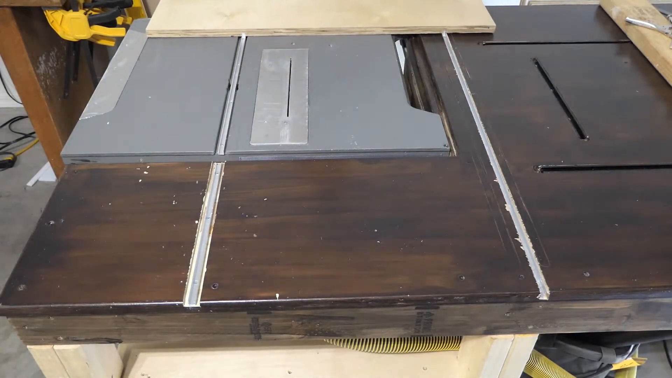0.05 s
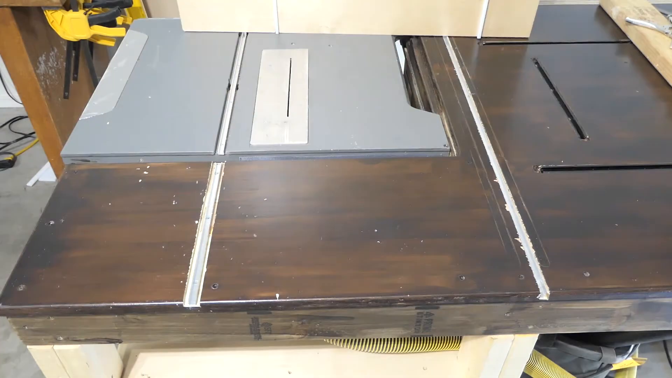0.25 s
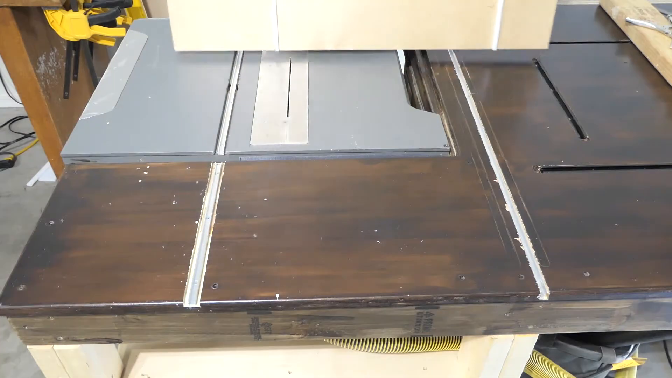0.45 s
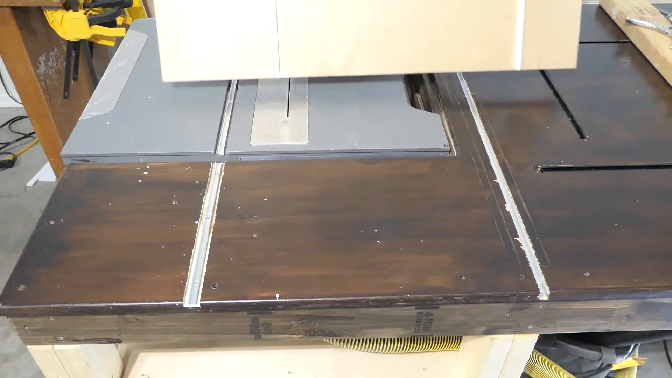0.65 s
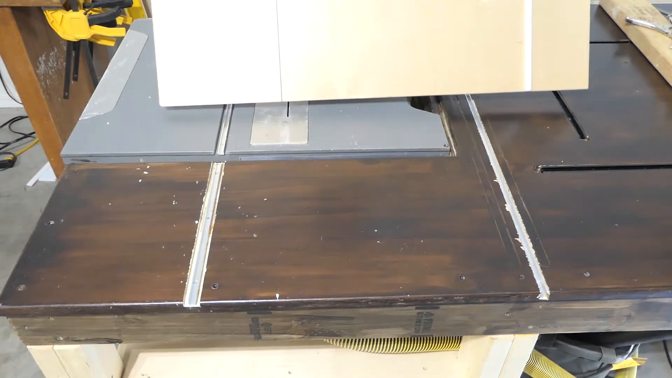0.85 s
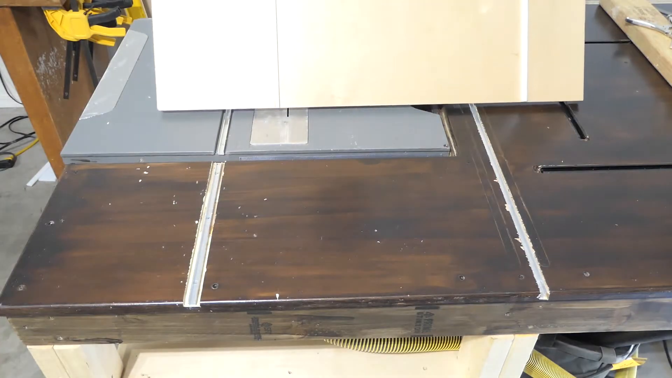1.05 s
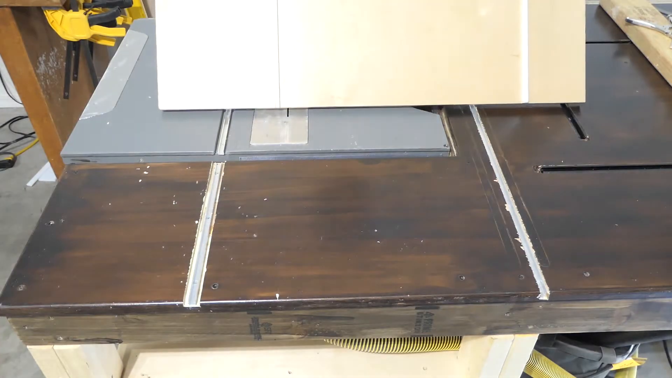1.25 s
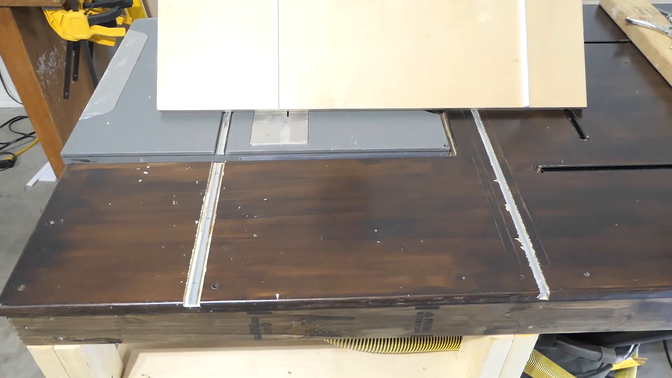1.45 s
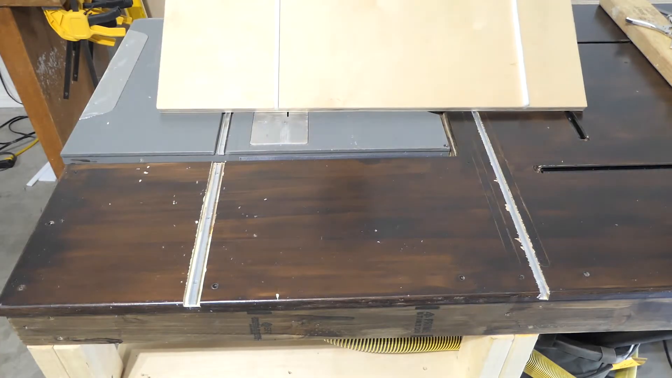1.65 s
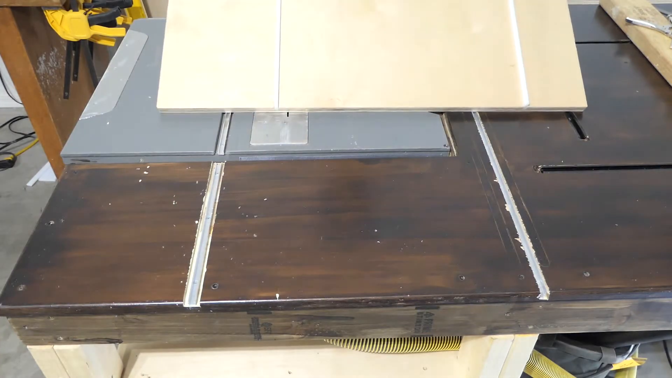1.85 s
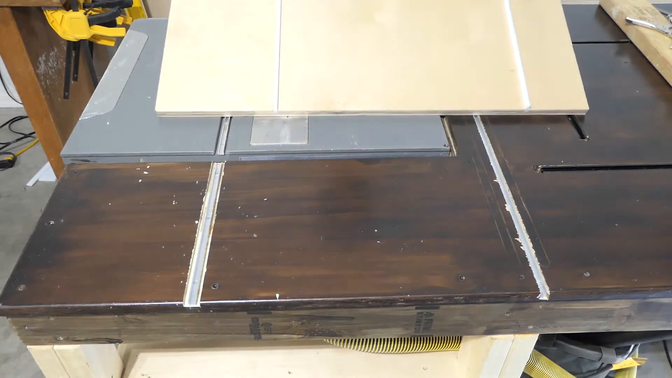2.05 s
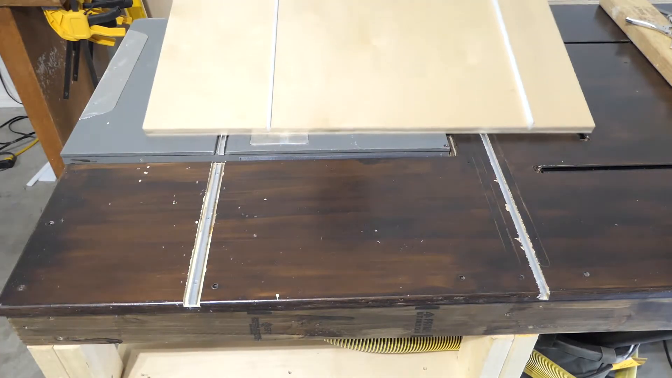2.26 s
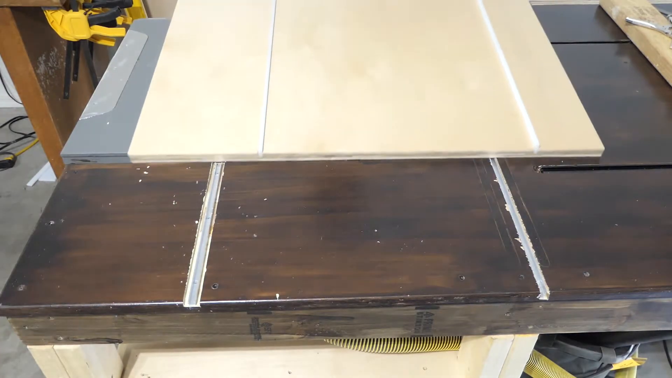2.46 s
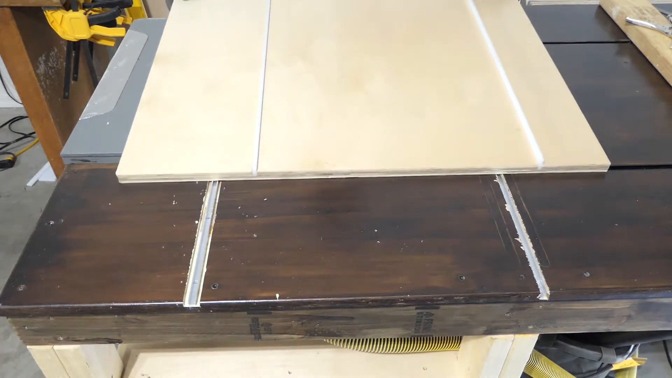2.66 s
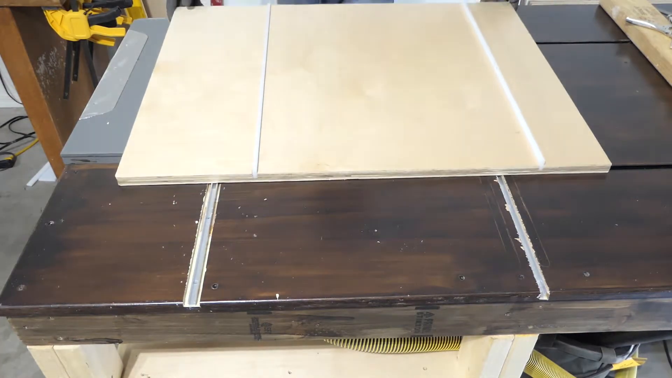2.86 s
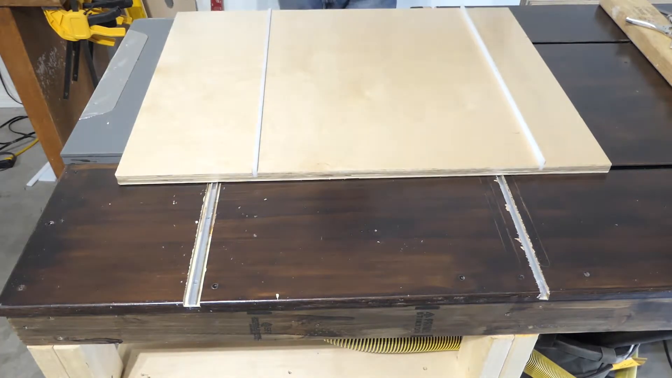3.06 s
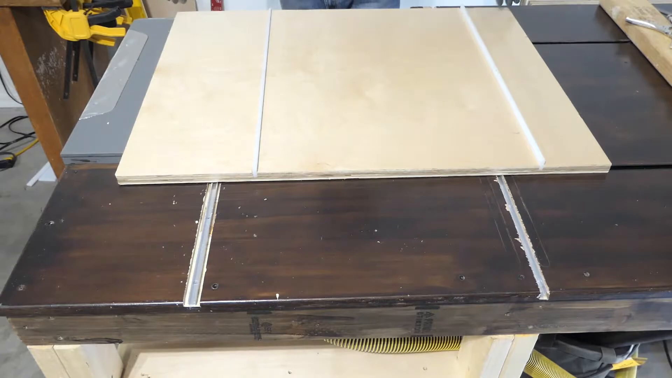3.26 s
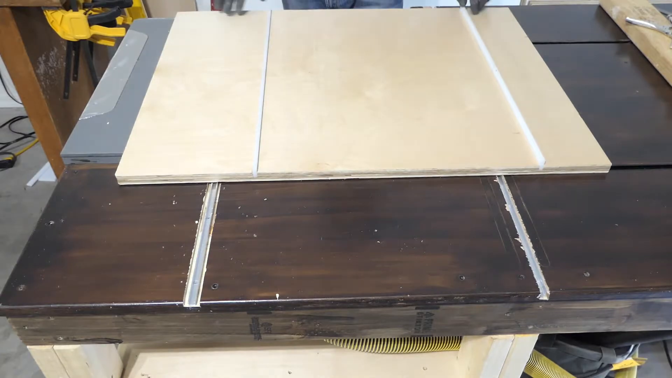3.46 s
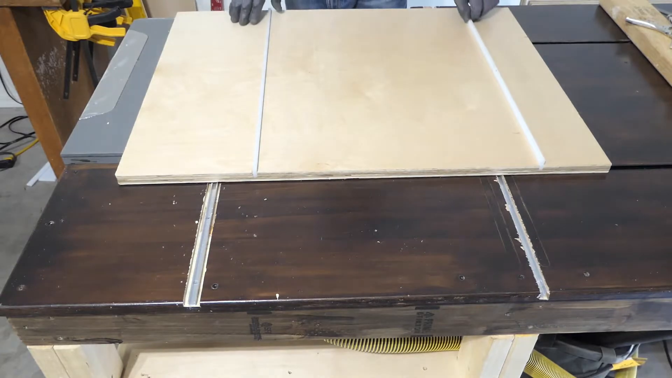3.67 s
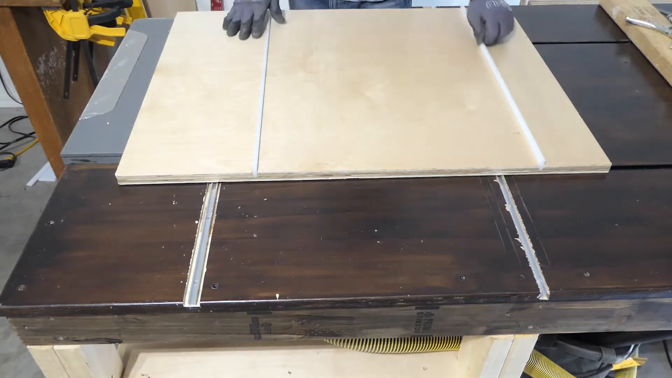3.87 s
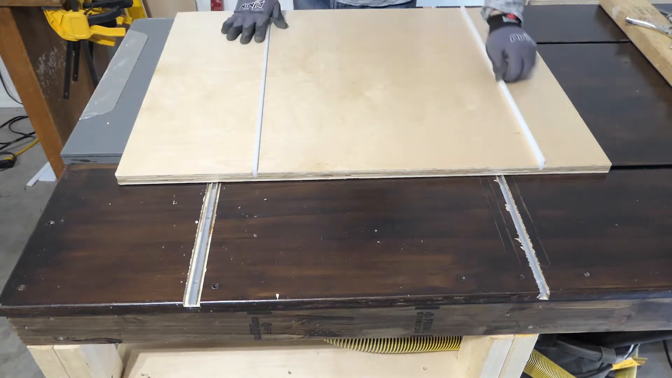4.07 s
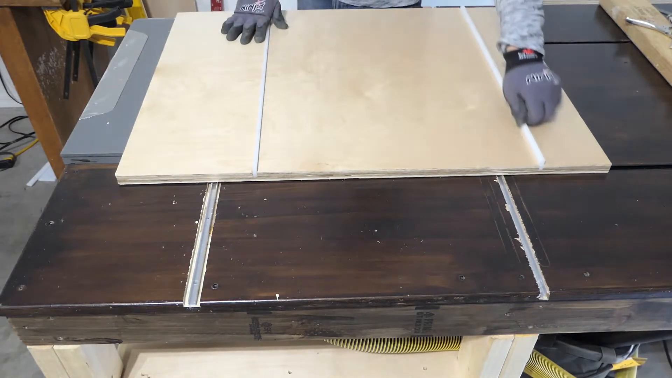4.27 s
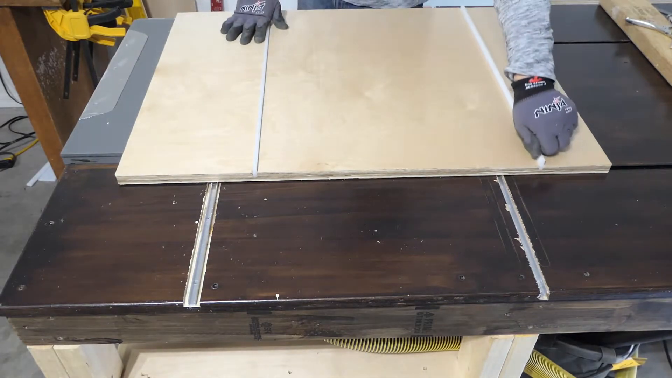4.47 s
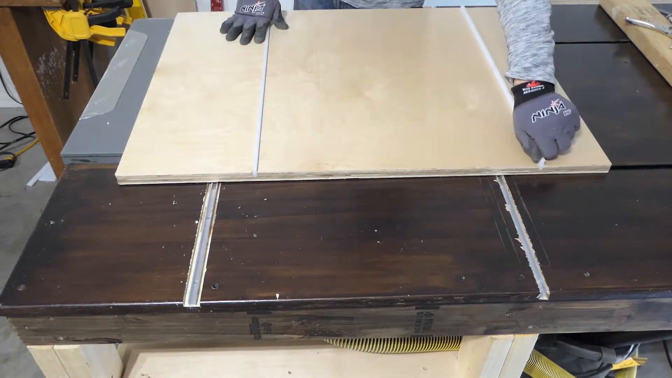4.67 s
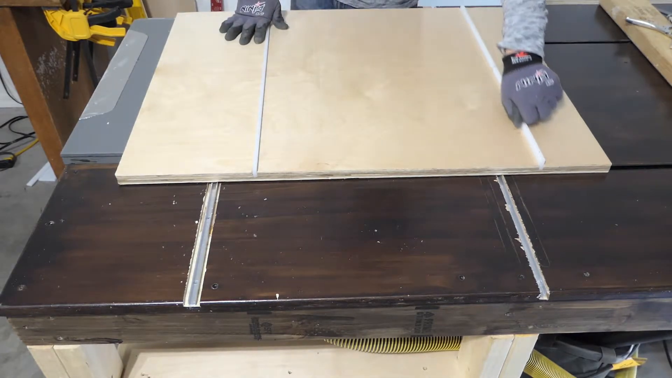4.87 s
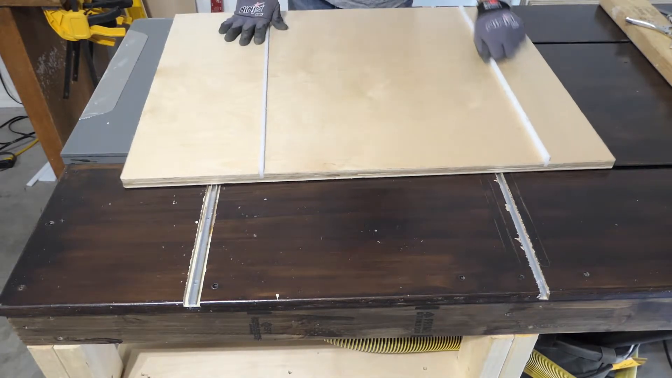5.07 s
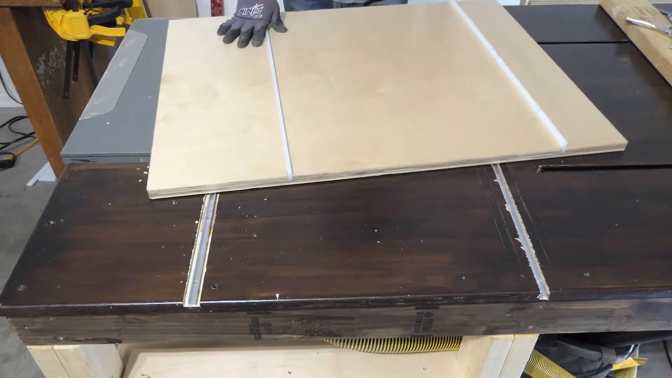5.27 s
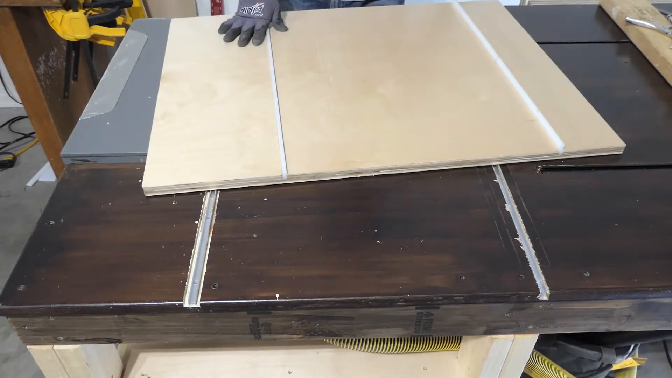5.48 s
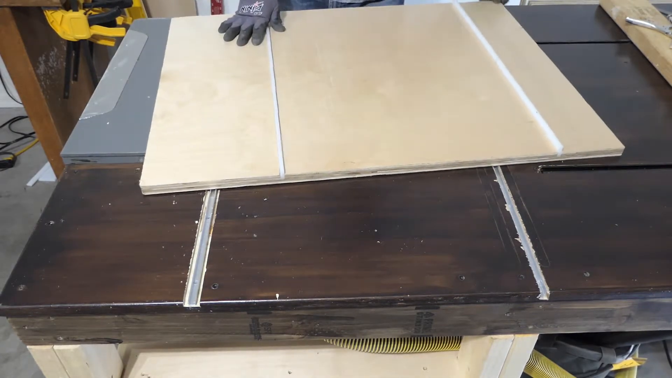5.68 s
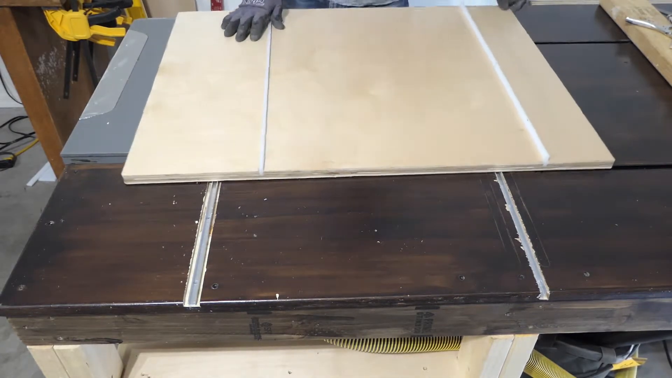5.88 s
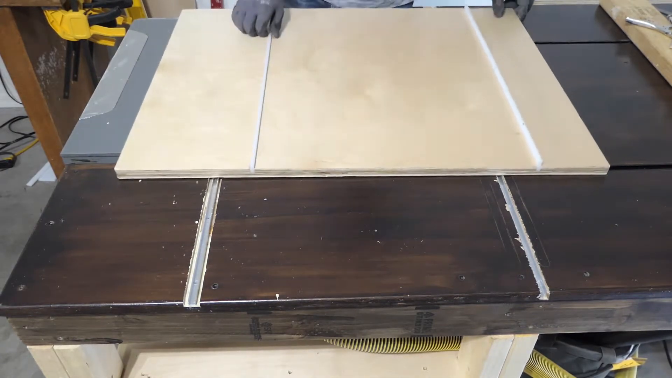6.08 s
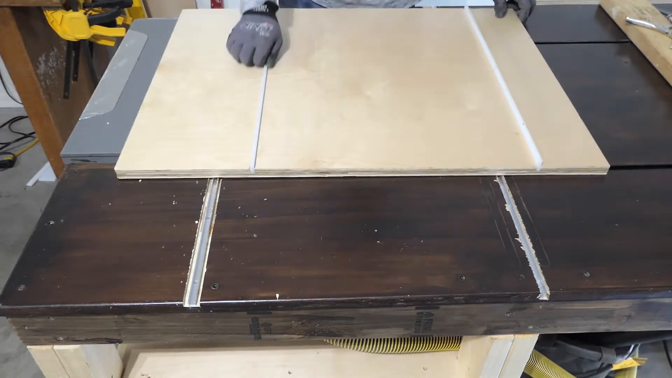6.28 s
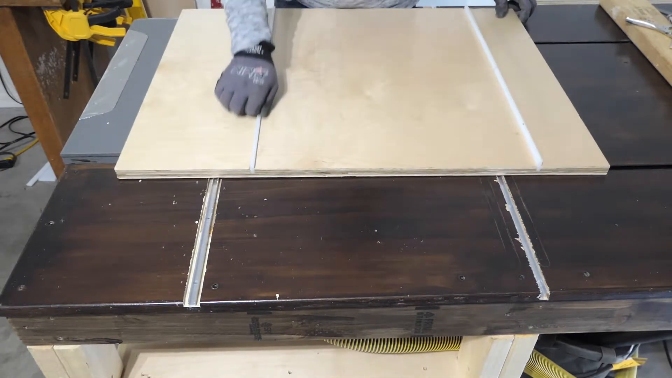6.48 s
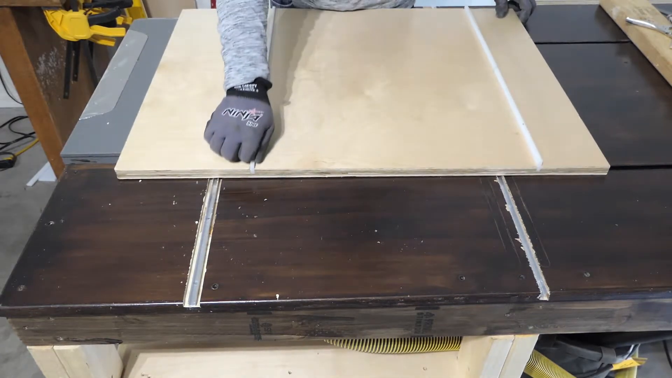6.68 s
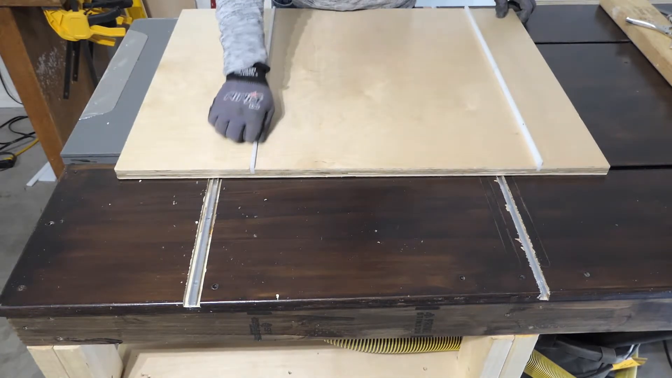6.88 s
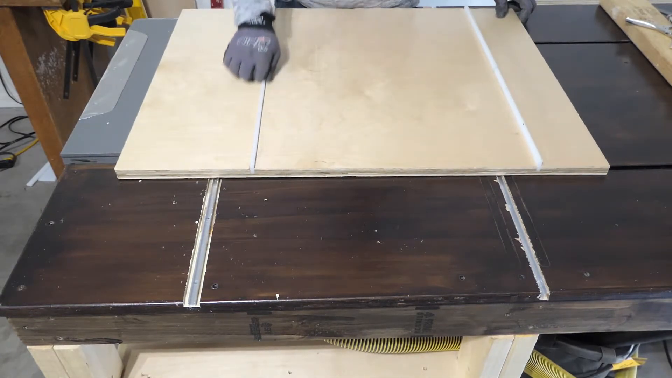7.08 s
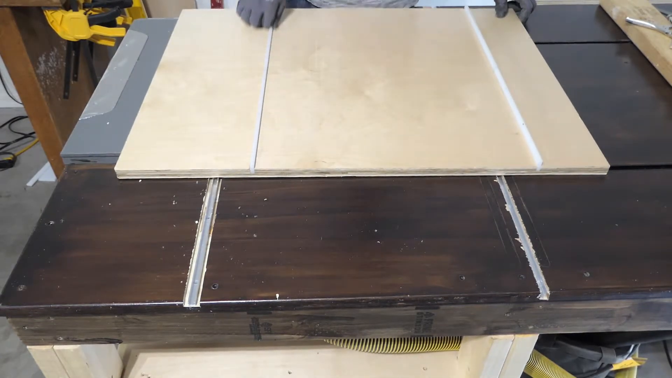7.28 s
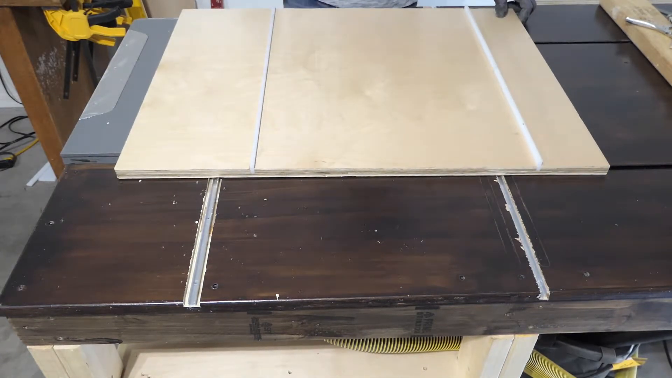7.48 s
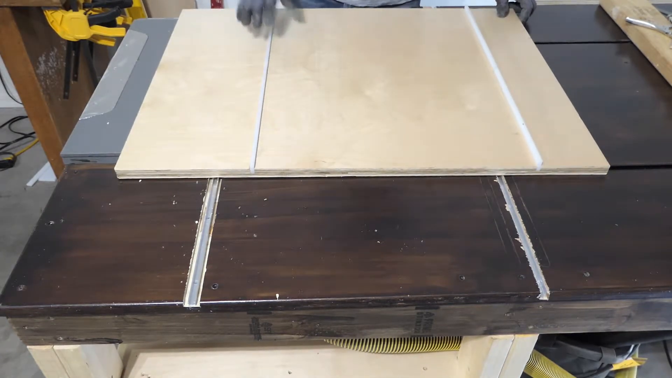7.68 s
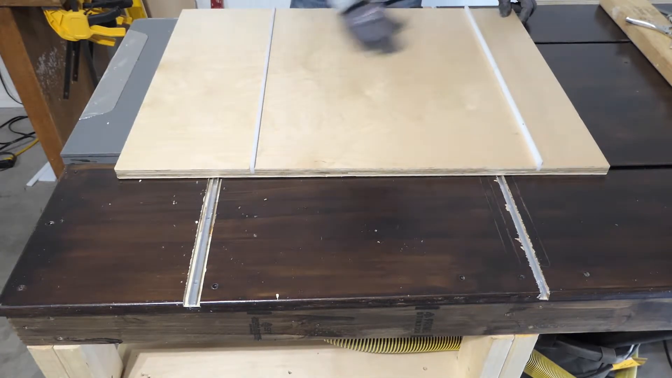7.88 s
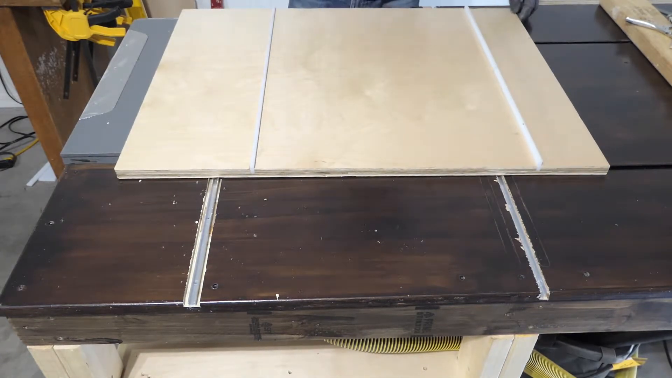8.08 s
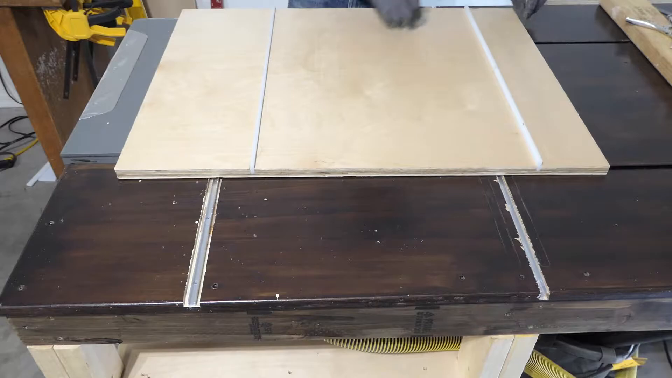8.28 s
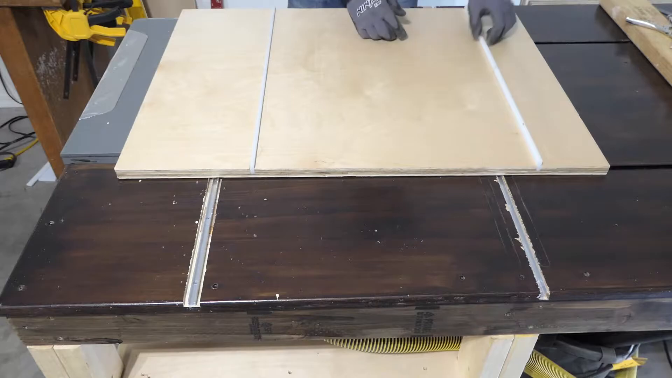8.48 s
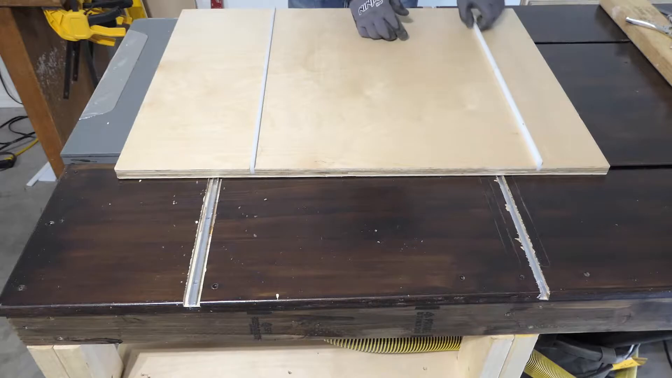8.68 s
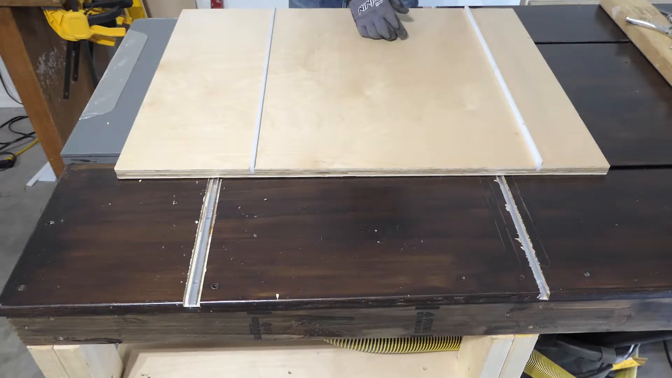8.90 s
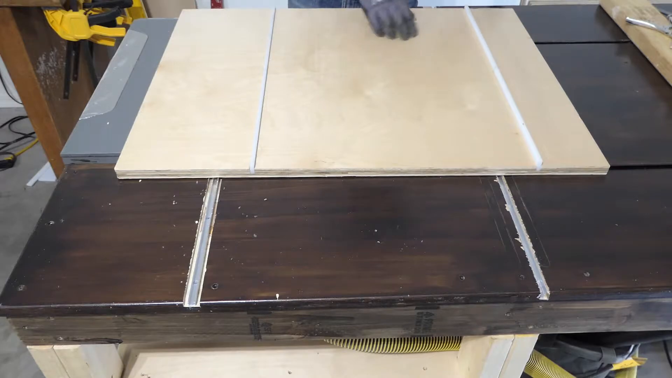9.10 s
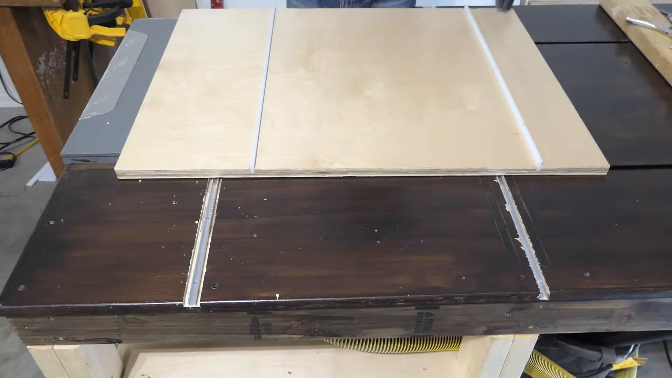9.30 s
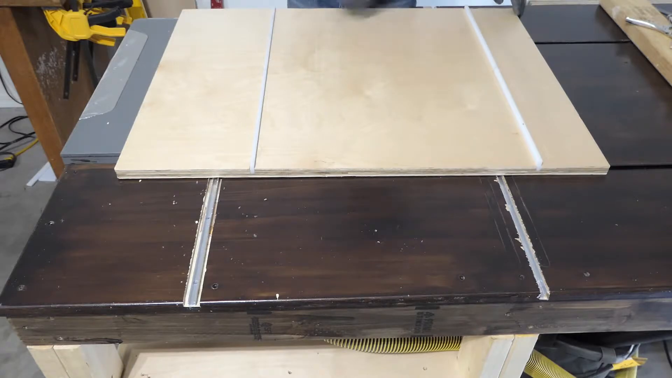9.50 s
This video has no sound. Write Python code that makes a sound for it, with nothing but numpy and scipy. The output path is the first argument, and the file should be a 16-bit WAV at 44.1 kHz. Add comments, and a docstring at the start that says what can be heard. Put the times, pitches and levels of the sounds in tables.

```python
"""A sleeve brushes a sheet of plywood as it scrapes over a table saw, above the soft rumble of a workshop.
The panel, a sled base, is knocked, pushed along the mitre slots, lands with a hard clack and is shifted again.
Gloved hands wipe it and sweep over it in long strokes; the saw stays off.
Rubbing is filtered noise full of tiny slips, blows are decaying tones and noise through the panel's
resonances, and decaying noise echoes make the room around two microphones."""
import sys
import numpy as np
from scipy import signal
from scipy.fft import rfft, irfft, next_fast_len
from scipy.io import wavfile
from scipy.ndimage import uniform_filter1d, map_coordinates

SR = 44100
rng = np.random.default_rng(int(sys.argv[2]) if len(sys.argv) > 2 else 0)


def wrap_up_sound(samples):
    """Save the sound to the file named by the first command line argument, as 16-bit audio."""
    columns = np.atleast_2d(samples).T
    # keep every value between -1 and 1, then stretch to whole-number steps
    tamed = np.clip(columns, -1, 1)
    steps = np.round(tamed * 32767).astype(np.int16)
    wavfile.write(sys.argv[1], SR, steps)


N = 420713  # length in samples
STEP_S = 0.002  # seconds between the points on which movements are drawn


def amp(db):
    """Decibels to gain."""
    return 10 ** (np.asarray(db) / 20)


def unit(x):
    """Scaled to rms 1."""
    return x / np.sqrt(np.mean(x ** 2) + 1e-20)


def along(points, hz):
    """(Hz, value) points read on a log frequency axis."""
    f, v = np.transpose(points)
    return np.interp(np.log(hz + 1), np.log(f + 1), v)


def filtered(x, response):
    """x times a complex response of frequency."""
    n = x.shape[-1]
    padded = next_fast_len(n + SR // 2)
    hz = np.fft.rfftfreq(padded, 1 / SR)
    return irfft(rfft(x, padded) * response(hz), padded)[..., :n]


def coloured(x, spectrum):
    """x given a spectrum, at rms 1."""
    return unit(filtered(x, lambda hz: amp(along(spectrum, hz))))


def resonance(hz, centre, width):
    """A causal band-pass with gain 1 at its centre."""
    return 1j * hz * width / (centre ** 2 - hz ** 2 + 1j * hz * width)


def add(track, s, sound):
    """Mix a sound into a track at time s."""
    part = track[max(round(s * SR), 0):][:len(sound)]
    part += sound[:len(part)]


def gains(rows, fade=0.013):
    """One gain per sample for each dB column, fading out (seconds) beyond the first and last row."""
    s, *columns = np.transpose(rows)
    t = np.arange(N) / SR
    gate = np.clip(1 + np.minimum(t - s[0], s[-1] - t) / fade, 0, 1)
    return np.array([gate * amp(np.interp(t, s, column)) for column in columns])


def clock():
    """The coarse time steps on which movements are drawn."""
    return np.arange(0, N / SR + STEP_S, STEP_S)


def sampled(curves):
    """Curves on the coarse steps, one value per sample."""
    t = np.arange(N) / SR
    return np.array([np.interp(t, clock(), curve) for curve in curves])


def swells(rows, curve):
    """A gain for each level column: every movement eases in, holds, then loses 20 dB in its fall time."""
    total = 0
    for start, rise, hold, fall, db, *others_db in rows:
        t = clock() - start
        slowing = np.maximum(t - rise - hold, 0) / fall
        shape = np.sin(np.pi / 2 * np.clip(t / rise, 0, 1)) * amp(-20 * slowing ** curve)
        # later columns are levels against the first
        total = total + np.outer(amp([0, *others_db]), amp(db) * shape)
    return sampled(total)


def wobble(rate):
    """A smooth random curve with rate knots a second."""
    knots = rng.standard_normal(int(N * rate / SR) + 4)
    return map_coordinates(knots, [np.arange(N) * rate / SR])


def friction(spectrum, rate, smooth_db, uneven_db):
    """Fibres catch and let go: about rate tiny slips a second over a smooth rub, under uneven pressure."""
    slips = (rng.random(N) < rate / SR) * rng.standard_normal(N)
    force = unit(slips) + amp(smooth_db) * rng.standard_normal(N)
    pressure = amp(uneven_db * wobble(55))
    return coloured(force * pressure, spectrum)


def pushing(scrape_db=1.0, grit_db=2.0, judder_db=-1, judder_limit_db=-21):
    """Strength of scrape, grit and judder; in the long push the panel's weight caps the judder."""
    # The long push along the slots. Each row: time in seconds, scrape and grit in dB before their trims.
    long_push = [(1.3, -34, -56), (1.344, -48, -59), (1.456, -37.5, -48.5), (1.51, -33, -49),
                 (1.672, -41.5, -47), (1.726, -33.5, -38), (1.888, -42.5, -45), (2.066, -31, -37),
                 (2.13, -28.5, -42), (2.196, -15.5, -31.5), (2.292, -14, -26.5), (2.356, -16, -36.5),
                 (2.7, -27, -42), (2.724, -21, -47), (2.908, -39.5, -51), (2.95, -36, -52)]
    # Short shoves of the panel. Each row: start, rise, hold and fall in seconds, scrape in relative dB,
    # grit and judder in dB against the scrape.
    shoves = [(0.0, 0.0017, 0.089, .02, -34.5, -11.5, -5), (0.09, 0.023, 0.122, .008, -32, -12.5, -5.5),
              (0.34, 0.014, 0.0071, 0.042, -31, -22, -14), (0.625, 0.019, .01, 0.17, -41.5, -23, -18.5),
              (2.95, 0.038, 0.035, 0.012, -26, -6.5, -6), (3.006, 0.014, 0.14, 0.22, -22.5, -17, 1),
              (4.18, 0.0081, .02, 0.65, -42, -2, -2.5), (5.066, 0.18, 0.044, 0.15, -30, -8, -1),
              (5.44, 0.021, .03, 0.048, -47.5, -11, 9.5), (5.68, 0.051, 0.0082, .02, -42, -5, 5),
              (5.745, 0.13, 0.034, 0.3, -28.5, -13.5, -3)]
    scrape, grit = gains(long_push) * amp([[scrape_db], [grit_db]])
    judder = amp(judder_db) * scrape / np.hypot(1, scrape / amp(judder_limit_db))
    return np.array([scrape, grit, judder]) + swells(shoves, curve=1.3)


def shifting(x, depth_db, hz_size=3, time_size=8):
    """As the points of contact travel, now one band of frequencies is favoured, now another."""
    z = signal.stft(x, nperseg=1024)[2]
    field = uniform_filter1d(rng.standard_normal(z.shape), hz_size, 0)
    field = uniform_filter1d(field, time_size, 1)
    return unit(signal.istft(z * amp(depth_db * unit(field)), nperseg=1024)[1][:N])


def sliding():
    """Wood on the table: a mid scrape, brighter grit and a low judder, each made of stick and slip."""
    # Spectra of the three rubs. Each row: frequency in Hz, gain in dB.
    scrape_tone, grit_tone, judder_tone = [(150, -30), (400, -8), (650, -0.5), (1100, -0.5), (1700, -1.5),
                                           (2400, -6), (2900, -14.5), (3600, -21), (7000, -76)], [(1000, -30), (2200, 4), (3400, 2.5),
                                                           (4200, -1.5), (5200, -15), (7000, -31),
                                                           (10000, -41), (16000, -54)], [(30, -47), (70, -38), (120, -11.5),
                                                                         (200, -0.5), (320, 5), (480, 2.5),
                                                                         (750, -1.5), (1500, -73)]
    scrape, grit, judder = pushing()
    scrape_rub = shifting(friction(scrape_tone, rate=2500, smooth_db=-2.0, uneven_db=1), depth_db=2.5)
    grit_rub = friction(grit_tone, rate=2000, smooth_db=2, uneven_db=3.5)
    judder_rub = shifting(friction(judder_tone, rate=600, smooth_db=-6.5, uneven_db=2.0), depth_db=2.0)
    return (amp(-3.5) * scrape * scrape_rub
            + amp(-1.5) * grit * grit_rub
            + amp(-5.5) * judder * judder_rub)


def plywood(force, lowest_hz=98):
    """The panel rings at its resonances and is too small to radiate the deepest bass."""
    # Resonances of the plywood on the table. Each row: centre in Hz, width in Hz, gain in dB.
    panel_modes = [(148.3, 14, -3.5), (201.6, 22, -6.5), (286.5, 87, 0), (431.6, 15.4, 3.5), (647, 4.3, -2),
                   (846, 3.4, 7), (1058, 4.7, -1), (1287, 25, -3.5), (1614, 8.7, -6), (1883, 130, -9.5),
                   (2476, 130, -6), (3510, 43, -6)]

    def response(hz):
        body = 1 + sum(amp(db) * resonance(hz, centre, width) for centre, width, db in panel_modes)
        radiation = 1j * hz / lowest_hz * resonance(hz, lowest_hz, lowest_hz)
        return body * radiation

    return filtered(force, response)


def travel(start, rise, hold, fall):
    """Speed of a hand that gathers pace, glides and comes to rest."""
    t = clock() - start
    return np.sin(np.pi / 2 * np.clip(np.minimum(t / rise, (rise + hold + fall - t) / fall), 0, 1))


def stroking(hiss_db=-41, swish_db=-40.0, drag_db=-44):
    """Strength of hiss, swish and drag: a faster hand is brighter, a heavier one drags more."""
    # Long strokes of a glove. Each row: start, rise, hold and fall in seconds, top speed in dB,
    # pressure in dB.
    glove_strokes = [(3.546, 0.45, 0.23, 0.42, -7.5, 0), (4.732, 0.52, 0.036, 0.065, -2.5, 0.5),
                     (6.147, 0.077, 0.22, 0.36, 0.5, -2), (6.808, 0.31, 0.21, 0.14, -1.9, 1)]
    total = 0
    for *timing, speed_db, pressure_db in glove_strokes:
        speed = amp(speed_db) * travel(*timing)
        # each part grows with its own power of the speed
        hiss = amp(hiss_db) * speed ** 1.28
        swish = amp(swish_db) * speed ** 0.96
        drag = amp(drag_db + pressure_db) * speed ** 0.29
        total = total + np.array([hiss, swish, drag])
    return sampled(total)


def gloves():
    """Sleeve and gloves hiss and swish over the grain; a pressed palm adds a duller drag."""
    # A sleeve brushes the panel. Each row: start, rise, hold and fall in seconds, hiss in dB,
    # swish in dB against the hiss.
    sleeve_brushes = [(0.0, 0.17, .06, 0.17, -53, 3), (1.012, .01, 0.009, 0.073, -63, -8),
                      (1.188, .01, .015, .07, -59.5, 3), (1.35, 0.11, 0.22, 0.081, -57.5, 2.5),
                      (1.67, .05, .01, 0.47, -46, 7.5), (1.9, 0.12, .04, 0.14, -51.5, 8),
                      (2.14, 0.15, .06, 0.58, -54, -12), (2.52, 0.024, .01, 0.33, -56, 6),
                      (2.72, 0.0063, .01, 0.066, -53.5, 7), (2.95, 0.028, 0.014, .015, -52, -6),
                      (5.36, 0.052, .02, .08, -57, -11), (5.7, 0.2, 0.23, 0.077, -58.5, 3.5)]
    # Spectra of the fabric. Each row: frequency in Hz, gain in dB.
    hiss_tone, swish_tone, drag_tone = [(4000, -23), (6500, -3), (8000, -6.5), (9700, -0.5), (11500, -2.5),
                                        (14000, -5), (16000, -12)], [(900, -12), (2300, -4), (3500, 3), (4400, 2),
                                                      (5600, -4), (7500, -24), (9700, -28), (13000, -26)], [(100, -38), (300, -1), (600, -4.5),
                                                                     (950, -5.5), (1500, -2.5), (2200, 0.5),
                                                                     (3200, -4), (5000, -20.5)]
    hiss, swish, drag = stroking()
    sleeve_hiss, sleeve_swish = swells(sleeve_brushes, curve=0.81)
    return ((hiss + sleeve_hiss) * friction(hiss_tone, rate=5000, smooth_db=-2.0, uneven_db=0.5)
            + (swish + sleeve_swish) * friction(swish_tone, rate=4000, smooth_db=0.5, uneven_db=2.0)
            + drag * friction(drag_tone, rate=2200, smooth_db=6.5, uneven_db=3.0))


def spread(mid, side):
    """Left and right of a diffuse sound; the two microphones hear nearly the same low mids."""
    # Stereo width of the workshop. Each row: frequency in Hz, side gain against mid in dB.
    side_width = [(30, 1), (80, -10), (250, -10), (600, -3.5), (1100, -2), (2100, -7.5), (4000, -5),
                  (8000, 5), (14000, -2)]
    side = filtered(side, lambda hz: amp(along(side_width, hz)))
    return np.array([mid + side, mid - side])


def room_tone(level_db=-47.6):
    """The steady low rumble of the room, as shaped noise spread over both microphones."""
    # Spectrum of the rumble. Each row: frequency in Hz, gain in dB.
    air_tone = [(20, -24), (50, -16), (90, -5.5), (140, 1.5), (230, 2.5), (340, -6.5), (480, -7),
                (700, -16.5), (1200, -18.5), (2300, -18.5), (3500, -29.5), (6000, -41), (10000, -35),
                (16000, -39.5)]
    return amp(level_db) * spread(*coloured(rng.standard_normal((2, N)), air_tone))


def workshop(x, wet_db=-2.5, delay=0.0035, build=0.00087, size=32768):
    """Near walls answer densely, the treble dying first; each overlapping stretch has new echoes."""
    # Reverberation of the workshop. Each row: frequency in Hz, time to fall by 60 dB in seconds.
    room_decay = [(100, 1.5), (300, 0.76), (1000, 0.69), (3000, 0.5), (6000, 0.49), (14000, 0.0071)]
    hop = size // 2
    out = np.zeros((2, N + 3 * size))
    x = np.pad(x, (hop, size))
    for start in range(0, N + hop, hop):
        hz, t, z = signal.stft(rng.standard_normal((2, size)), SR, nperseg=256)
        onset = 1 - np.exp(-np.maximum(t - delay, 0) / build)
        shape = amp(-60 * t / along(room_decay, hz)[:, None]) * onset
        shape = shape / np.linalg.norm(shape, axis=1, keepdims=True)  # equal energy in every band
        tail = signal.istft(z * shape, SR, nperseg=256)[1]
        piece = x[start:start + size] * np.hanning(size)
        echo = signal.fftconvolve(piece[None], tail / np.linalg.norm(tail[0]), axes=1)
        out[:, start:start + echo.shape[1]] += echo
    return amp(wet_db) * spread(*out[:, hop:hop + N])


def knocks(thump_t60=0.058, rattle_t60=0.26, boom_t60=0.13, attack=0.0031):
    """Each blow bends the panel for a few cycles, makes it chatter and shakes the saw cabinet."""
    # Blunt blows of table and hands. Each row: time in seconds, blow in relative dB, pitch in Hz,
    # rattle and boom in dB before their trims.
    blows = [(0.354, -17, 418, -4, -16), (1.014, -13.5, 217, -9.5, -2.5), (1.036, -13.5, 175, -25, -8.5),
             (1.058, -18, 411, -10.5, -1), (1.19, -12.5, 502, -8, -13), (1.199, 1.5, 322, -21, -15),
             (1.244, -9, 431, -15, -7.5), (1.329, -18.5, 313, -17, -1.5), (2.537, -7, 217, -10.5, -3),
             (2.731, -3, 230, -8.5, -4), (2.749, -4.5, 335, -39, -12.5), (3.0157, -5, 269, -10.5, -4.5),
             (4.186, -31.5, 680, 2, -16), (5.148, -17.5, 290, -22, -15), (5.453, -31, 300, -9, -9),
             (5.771, -22.5, 276, -32, -7), (7.446, -24, 170, -8, -12.5), (7.475, -34, 244, -2.5, -3),
             (7.852, -25.5, 193, -8.5, -14), (8.556, -30, 151, -19.5, -5), (8.835, -31.5, 267, -8, -0.5),
             (9.275, -30.5, 380, -6, -3.5), (9.306, -29, 141, -20, -2.5)]
    # Spectra of chatter and cabinet. Each row: frequency in Hz, gain in dB.
    rattle_tone, boom_tone = [(150, -20), (450, 4), (850, 7.5), (1400, 2), (2400, -4), (4000, -17),
                              (6000, -39.5), (15000, -53)], [(30, -52), (55, -26), (85, -11), (130, -4), (200, -0.5),
                                              (330, -0.5), (500, -5.5), (750, -13.5), (1500, -63)]
    track, t = np.zeros(N), np.arange(SR // 3) / SR
    for s, db, hz, rattle_db, boom_db in blows:
        thump = amp(-0.5) * np.sin(2 * np.pi * hz * t) * amp(-60 * t / thump_t60)
        rattle = coloured(rng.standard_normal(len(t)), rattle_tone)
        rattle = rattle * amp(rattle_db - 3.5 - 60 * t / rattle_t60)
        boom = coloured(rng.standard_normal(len(t)), boom_tone) * amp(boom_db - 60 * t / boom_t60)
        add(track, s, amp(db - 4.5) * (1 - np.exp(-t / attack)) * (thump + rattle + boom))
    return track


def wipes():
    """Light, quick wipes of the glove's fingers: a thin bright hiss and a mid rustle."""
    # Each row: start, rise, hold and fall in seconds, hiss in dB, rustle in dB against the hiss
    # (before its trim).
    finger_wipes = [(0.63, 0.023, .012, 0.11, -61, 3), (3.47, 0.048, .005, .08, -55, 5.5),
                    (7.14, 0.2, 0.076, 0.068, -59, 14.5), (7.828, 0.03, 0.12, 0.19, -44.5, 1),
                    (8.372, .015, .02, 0.15, -62.5, 12), (8.548, .04, .005, .03, -61.5, 6.5),
                    (8.616, 0.2, .012, 0.086, -44.5, 1.5), (9.1, 0.15, .02, 0.08, -47, -2.5),
                    (9.418, 0.034, .02, .1, -71.5, 13)]
    # Spectra of hiss and rustle. Each row: frequency in Hz, gain in dB.
    fine_tone, rustle_tone = [(4500, -14), (6000, -13), (8000, -10.5), (10000, -0.5), (13000, -3.5),
                              (16000, -6)], [(400, -22), (1000, -14), (1700, -6), (2400, 1.5), (3500, -1),
                                            (4500, -3.5), (5600, -10.5), (9000, -24)]
    hiss, rustle = swells(finger_wipes, curve=0.89)
    return (hiss * friction(fine_tone, rate=5000, smooth_db=8.0, uneven_db=0.5)
            + amp(-1.0) * rustle * friction(rustle_tone, rate=2500, smooth_db=0, uneven_db=2.0))


def clacks(edge_hz=2300, edge_t60=0.011, crack_t60=0.0069, attack=0.000077):
    """The hard edge snaps against the table: a bright crack and a very short ring."""
    # Hard contacts of the panel's edge. Each row: time in seconds, level in relative dB.
    edge_hits = [(1.711, -20), (2.729, -17), (3.0143, 4), (4.764, -34), (7.833, -34), (8.378, -51)]
    # Spectrum of the crack. Each row: frequency in Hz, gain in dB.
    crack_tone = [(300, -18.5), (800, -20), (1500, 18.5), (4200, 8), (6000, -27), (9000, -10.5),
                  (11500, -22), (16000, -31)]
    track, t = np.zeros(N), np.arange(SR // 20) / SR
    for s, db in edge_hits:
        ring = amp(-2.5) * np.sin(2 * np.pi * edge_hz * t) * amp(-60 * t / edge_t60)
        crack = coloured(rng.standard_normal(len(t)), crack_tone) * amp(-0.5 - 60 * t / crack_t60)
        add(track, s, amp(db) * (1 - np.exp(-t / attack)) * (ring + crack))
    return track


def scene():
    """Panel and hands before the microphones; the near edge is heard with little of the room."""
    far = plywood(sliding() + knocks()) + gloves() + wipes()
    near = clacks()
    room = workshop(far + amp(-6.5) * near)
    balance = amp([[-0.2], [0.2]])  # left, right
    return (far + near + room + room_tone()) * balance


def record(dry, notch_hz=3030, notch_width=280, order=6, top_hz=15800):
    """The microphone chain has a narrow notch, rounds off loud peaks and keeps nothing above top_hz."""
    x = filtered(dry, lambda hz: 1 - resonance(hz, notch_hz, notch_width))
    x = x / (1 + np.abs(x) ** order) ** (1 / order)
    return filtered(x, lambda hz: hz < top_hz)


dry = scene()
out = record(dry)
wrap_up_sound(out)
```